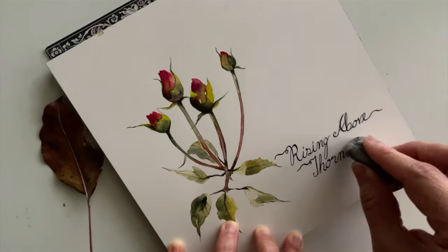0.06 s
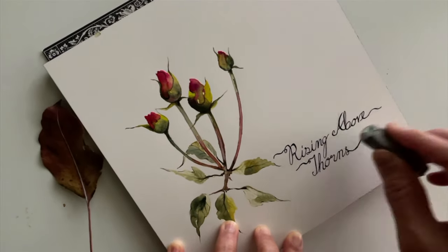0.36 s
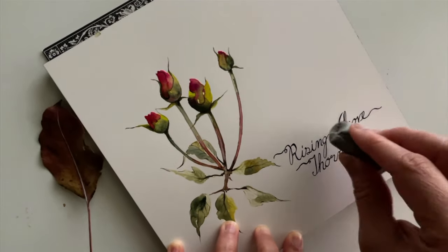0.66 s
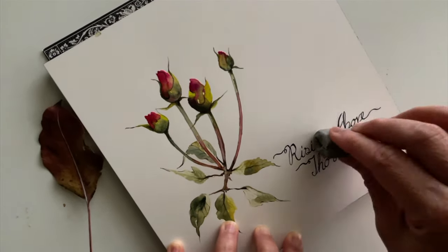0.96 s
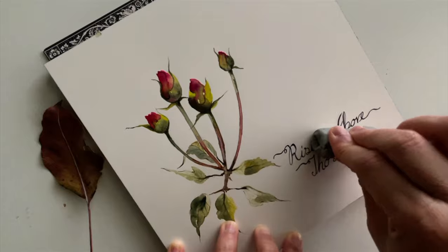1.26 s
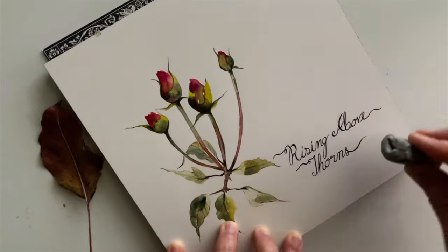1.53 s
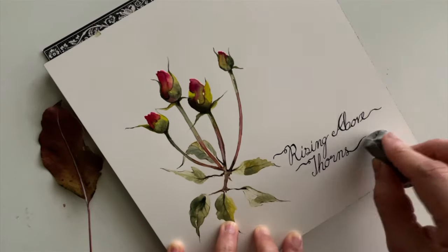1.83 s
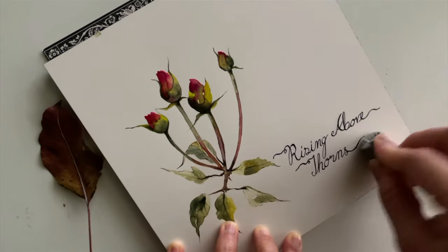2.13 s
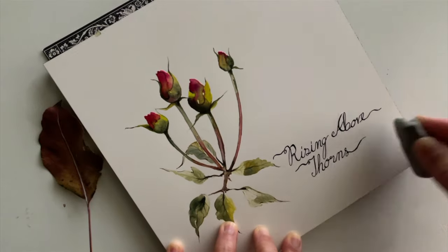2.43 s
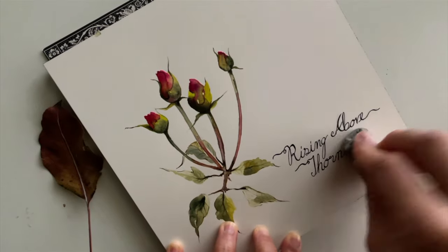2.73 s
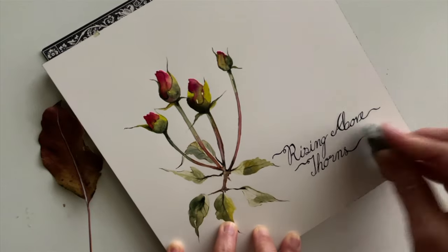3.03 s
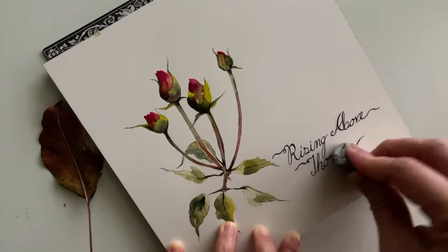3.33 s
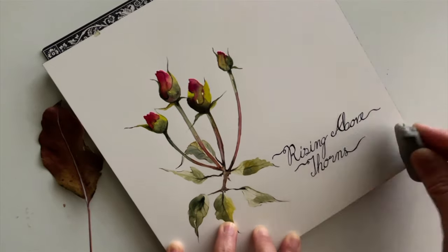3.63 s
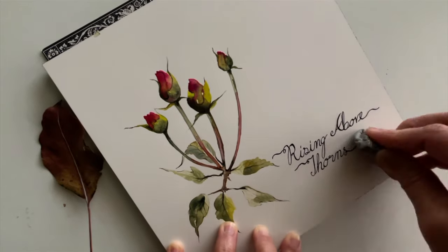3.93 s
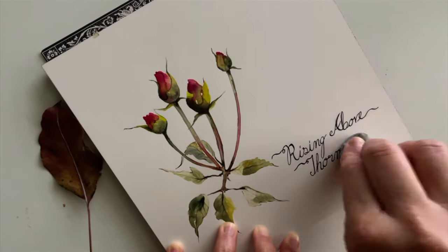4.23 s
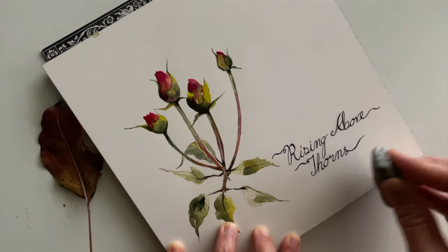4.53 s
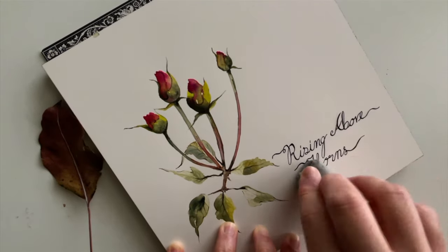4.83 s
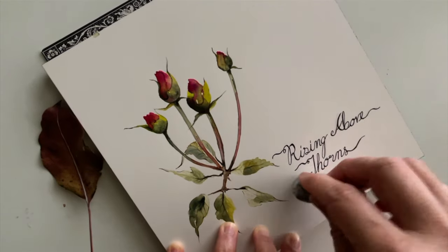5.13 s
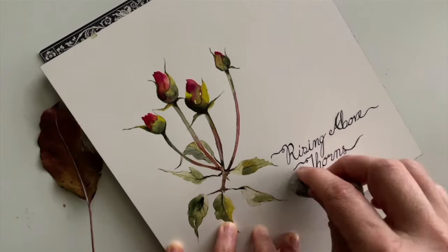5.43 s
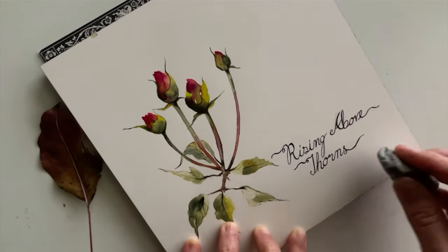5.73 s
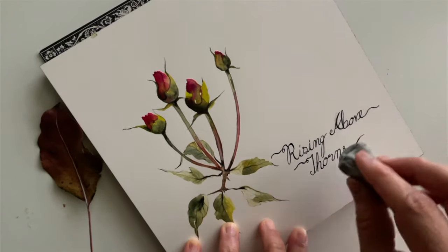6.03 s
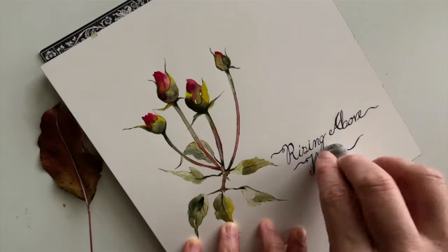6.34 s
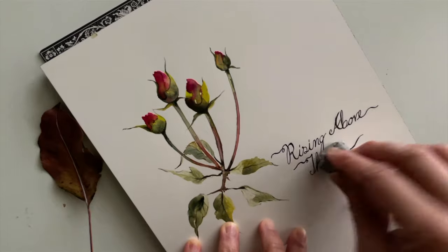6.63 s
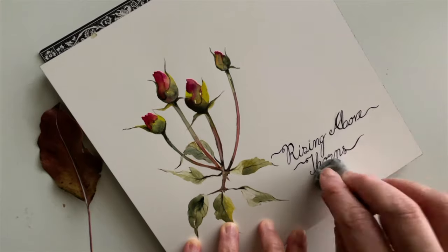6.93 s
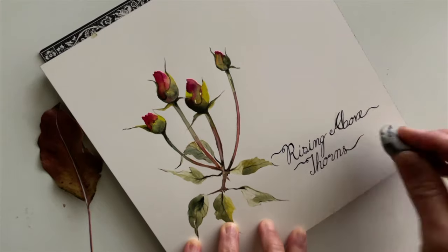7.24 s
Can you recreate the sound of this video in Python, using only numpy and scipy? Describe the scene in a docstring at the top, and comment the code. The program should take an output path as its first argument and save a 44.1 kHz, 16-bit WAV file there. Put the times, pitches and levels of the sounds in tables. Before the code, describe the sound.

Two quick runs of eraser taps on a paper pad, with faint rubbing and small ticks, in a quietly humming room.

```python
"""Dabbing with a kneaded eraser

A soft eraser is dabbed on a block of watercolour paper, in two quick runs and single light presses.
Each dab slaps the top sheet down and thumps the block; after quick dabs the sticky rubber ticks as it
peels off. In between, eraser and fingers brush over the paper. A low hum fills the quiet room."""
import sys
import numpy as np
from scipy import signal
from scipy.fft import rfft, irfft
from scipy.io import wavfile

SR = 44100
rng = np.random.default_rng(int(sys.argv[2]) if len(sys.argv) > 2 else 0)


def wav_out(sig):
    """Save sig, one row per channel (or a flat mono array), as 16-bit PCM at SR to the path in sys.argv[1]."""
    wavfile.write(sys.argv[1], SR, np.round(np.clip(np.atleast_2d(sig).T, -1, 1) * 32767).astype(np.int16))


N = 325458


def amp(db):
    """Turns decibels into a gain."""
    return 10 ** (np.asarray(db) / 20)

def unit(x):
    """Scales a signal to an average (rms) level of 1."""
    return x / np.sqrt(np.mean(x ** 2) + 1e-30)

def burst(x, db):
    """Gives a short sound the energy of 10 ms at this level."""
    return amp(db) * x / np.sqrt(np.sum(x ** 2) / (SR / 100))

def freqs(size=N):
    """The frequencies in the spectrum of this many samples."""
    return np.fft.rfftfreq(size, 1 / SR)

def read(points, hz):
    """Reads between the rows of a table, on a pitch-like (log) scale."""
    f, value = np.transpose(points)
    return np.interp(np.log(hz + 1), np.log(f + 1), value)

def add(mix, s, sound):
    """Mixes a sound in at s seconds."""
    part = mix[max(round(s * SR), 0):][:len(sound)]
    part += sound[:len(part)]

def colour(x, points):
    """Gives a long signal the tone colour in a table, at level 1."""
    return unit(irfft(rfft(x) * amp(read(points, freqs())), N))

def drift(max_hz):
    """A smooth random wander, no faster than max_hz."""
    return unit(irfft(rfft(rng.standard_normal(N)) * (freqs() < max_hz), N))


# Tone colour of the room's noise: f/Hz, level/dB
ROOM_NOISE = [(20, -15), (48, -2), (68, -4.5), (90, -4), (125, -8.5), (165, -11), (270, -13.5),
              (400, -20.5), (520, -21.5), (720, -35), (1500, -43.5), (2200, -45), (4000, -52), (12500, -60),
              (14000, -59.5)]
# How alike that noise is left and right: f/Hz, likeness/0-1
LIKENESS = [(60, 1), (150, 0.97), (300, 0.76), (600, 0), (1500, 0), (4000, 0), (12000, 0.2)]

def background(noise_db=-58, hum_hz=121.65, hum_db=-60.5):
    """Low rumble, faint hiss and a slightly wavering mains hum."""
    left, other = rfft(rng.standard_normal((2, N)))
    same = read(LIKENESS, freqs())
    right = same * left + np.sqrt(1 - same ** 2) * other
    air = np.array([colour(irfft(side, N), ROOM_NOISE) for side in (left, right)])
    hum = np.sin(2 * np.pi * hum_hz * np.arange(N) / SR + .52 * drift(3))
    hum *= amp(-.5 * drift(5))
    return amp(noise_db) * air + amp(hum_db) * unit(hum)

# How long the room takes to fade by 60 dB: f/Hz, t/s
ROOM_FADE = [(150, .33), (600, .24), (2000, .22), (3500, .21), (6000, .15), (14000, .09)]

def room_tail(level_db=-24, mono_hz=250, dull_hz=2000, rise_s=.00047):
    """The room's short, dull answer to a click, alike on both sides in the bass."""
    hz, t, noise = signal.stft(rng.standard_normal((2, SR // 2)), SR, nperseg=256)
    hz = hz[:, None]
    same = 1 / (1 + (hz / mono_hz) ** 4)
    noise[1] = same * noise[0] + np.sqrt(1 - same ** 2) * noise[1]
    noise *= amp(-60 * t / read(ROOM_FADE, hz)) * (1 - np.exp(-t / rise_s))
    noise /= np.sqrt(1 + (hz / dull_hz) ** 2)
    tail = signal.istft(noise, SR, nperseg=256)[1]
    return amp(level_db) * tail / np.linalg.norm(tail[0])

def room_echoes(x, echo_s=.019, echo_db=-22, tails=4, shifts_per_s=9):
    """One dull echo, and a short room tail that keeps varying, so no two hits ring alike."""
    turn = np.arange(N) / SR * shifts_per_s
    wash = np.zeros((2, N))
    for k in range(tails):
        distance = abs((turn - k) % tails - tails / 2)
        share = np.cos(np.pi / 2 * np.minimum(distance, 1))  # each tail fades into the next
        wash += signal.fftconvolve((share * x)[None], room_tail(), axes=1)[:, :N]
    echo = np.zeros(N)
    add(echo, echo_s, amp(echo_db) * signal.lfilter(*signal.butter(2, 1500, fs=SR), x))
    return wash + echo

# How far the left side runs ahead of the right: f/Hz, phase/radians
SIDE_PHASE = [(0, 0), (1900, .05), (3200, .55), (4800, 1.3), (8200, 2.5), (10400, 3.14), (13400, 4.9),
              (16500, 6.1)]

def left_and_right(x):
    """Sound from the paper reaches the two sides out of step in the treble."""
    phase = np.interp(freqs(), *np.transpose(SIDE_PHASE))
    return irfft(rfft(x) * np.exp(.5j * np.array([phase, -phase])), N)


def friction(spectrum, slips_per_s=11000, spread_db=3.5):
    """Many tiny slips over the rough paper, blended with smooth noise."""
    slips = rng.standard_normal(N) * amp(spread_db * np.minimum(rng.exponential(1, N), 4))
    slips *= rng.random(N) < slips_per_s / SR
    return colour(unit(slips) + .84 * rng.standard_normal(N), spectrum)

# Dull rub of the sheet: f/Hz, level/dB
RUB = [(300, -14.5), (600, 2.5), (1000, 4), (1550, -1.5), (2200, 3.5), (2900, -5.5), (3700, -4), (6000, -8),
       (9000, -11), (16000, -39)]
# Bright hiss of its grain: f/Hz, level/dB
HISS = [(1500, -35.5), (4000, -15.5), (7000, -7.5), (9000, -2), (11700, 1), (12700, -0.5), (13600, -12),
        (15700, -14.5), (16300, -40)]
# Quick brushing strokes: t/s, length/s, hiss level/dB, pressure/0-1
STROKES = [(1.034, .05, -83.5, 1), (1.09, .025, -76.5, 0.1), (1.369, 0.046, -68, .35),
           (1.948, 0.13, -86.5, 1), (2.261, 0.032, -73, .05), (2.421, 0.038, -69.5, 0.63),
           (2.783, 0.049, -77, .8), (2.893, 0.033, -77, 0.88), (3.057, 0.025, -68, .2),
           (3.187, 0.01, -71.5, 0.97), (3.264, 0.067, -81, 0.97), (3.349, 0.044, -74.5, .05),
           (3.453, 0.02, -70, 0.46), (3.565, 0.09, -69, 0.43), (3.942, 0.051, -80.5, .4),
           (4.152, 0.065, -74.5, 0.14), (4.366, 0.1, -71, 0.53), (4.983, 0.028, -67.5, 0.54),
           (5.685, 0.1, -76.5, 0.57), (5.845, 0.063, -79, .6), (6.308, 0.055, -84.5, 1),
           (6.477, 0.042, -72.5, 0.05), (6.568, .03, -75.5, .05), (6.704, 0.059, -65, 0.36),
           (7.221, .027, -65, 0.56)]

def brushing(drag_wait_s=.04, drag_db=-86, drag_pressure=.92, rest_db=-101):
    """Strokes, and firm drags just after most dabs, swell and fade with the speed of the hand."""
    t = np.arange(N) / SR
    drags = [(s + drag_wait_s, length, drag_db, drag_pressure) for s, *_, length in DABS if length > 0]
    rub_power = np.zeros(N)
    hiss_power = amp(rest_db + 4 * drift(4.3)) ** 2  # resting fingers stir faintly
    for start, length, db, pressure in STROKES + drags:
        along = 2 * (t - start) / length - 1
        power = amp(db) ** 2 * np.exp(-.3 * along ** 2 - .4 * along ** 4)
        rub_power += power * amp(-21 + 21.5 * pressure) ** 2  # pressure brings out the rub
        hiss_power += power
    rub = np.sqrt(rub_power) * friction(RUB) * amp(3 * drift(45))
    hiss = np.sqrt(hiss_power) * friction(HISS) * amp(4 * drift(80))
    return rub + hiss

def judder(start_s=1.238, length_s=.05, slips_per_s=255, level_db=-48):
    """The rubber grips and lets go in one short, uneven run, scuffing the grain."""
    size = round(length_s * SR)
    along = np.arange(size) / size
    turns = np.cumsum(slips_per_s * (1 + .11 * drift(170)[:size])) / SR
    rough_tone = [(150, -8), (330, 0), (550, -13), (950, -18), (1500, -35), (6000, -60)]  # f/Hz, level/dB
    rough = colour(rng.standard_normal(N), rough_tone)[:size]
    slips = np.sin(2 * np.pi * turns) + amp(-12) * rough
    swell = np.sin(np.pi * along) * np.exp(-3 * along)
    out = np.zeros(N)
    add(out, start_s, amp(level_db) * unit(slips * swell))
    return out

# Tone colour of rubber squashed on paper: f/Hz, level/dB
SCUFF = [(200, -9.5), (450, 1), (1300, -3.5), (2200, -8), (3500, -12.5), (7000, -17), (12000, -24),
         (16000, -40.5)]

def scuff(fade_s=.15, rise_s=.002, size=8192):
    """The squashed rubber creeps over the grain for a moment."""
    t = np.arange(size) / SR
    noise = irfft(rfft(rng.standard_normal(size)) * amp(read(SCUFF, freqs(size))))
    return noise * amp(-60 * t / fade_s) * (1 - np.exp(-t / rise_s))

# Ringing tones of the paper block: f/Hz, level/dB, time to fade by 60 dB/s
BLOCK_TONES = [(56, -11, 0.26), (104, -14.5, 0.28), (124.5, 6.5, 0.045), (146, -2, 0.14),
               (195, -10.5, 0.14), (273.3, -5, .13), (325, -10.5, 0.11), (484, -17, .13),
               (527, -23.5, 0.16)]

def thump(lift_db, rise_s=.0028, scatter_db=3):
    """The block rings on the table, never twice the same; lift_db raises its upper tones."""
    t = np.arange(SR // 3) / SR
    ring = np.zeros(len(t))
    for hz, db, fade_s in BLOCK_TONES:
        louder, higher = rng.standard_normal(2)
        level = db + lift_db * np.clip(np.log2(hz / 150), 0, 1) + scatter_db * louder
        ring += amp(level - 60 * t / fade_s) * np.sin(2 * np.pi * hz * (1 + higher / 50) * t)
    return ring * (1 - np.exp(-t / rise_s))

# Fingers knead the eraser without lifting it: t/s, scuff level/dB
PRESSES = [(.649, -64), (1.237, -66), (1.294, -69), (1.453, -71), (1.879, -70), (2.061, -72),
           (2.676, -70.5), (4.122, -73), (6.442, -73.5), (7.089, -75)]

def presses(dull_hz=900, thump_db=-53):
    """Kneading makes a short muffled scuff and softly bumps the block."""
    out = np.zeros(N)
    muffle = signal.butter(4, dull_hz, fs=SR)
    for s, db in PRESSES:
        add(out, s, burst(signal.lfilter(*muffle, scuff(fade_s=.037)), db))
        add(out, s, burst(thump(lift_db=8), thump_db))
    return out

def click_spectrum(gain):
    """Spectrum of the quickest click with this tone colour (minimum phase)."""
    log_gain = np.log(np.maximum(gain / gain.max(), 1e-4))
    mirrored = np.concatenate([log_gain, log_gain[-2:0:-1]])
    return np.exp(np.conj(signal.hilbert(mirrored)))[:len(gain)]

# Tone colour of snapping paper fibres: f/Hz, level/dB
FIBRES = [(1500, -27.5), (3500, -5), (5000, -4.5), (7000, -3), (9500, 6), (12500, -6), (14000, -17.5),
          (16500, -24.5)]

def crackle(spectrum=FIBRES, decay_s=.0011, size=2048):
    """A tight cluster of paper fibres snaps, then trails off faintly."""
    t = np.arange(size) / SR
    noise = rng.standard_normal(size) * (np.exp(-t / decay_s) + amp(-26) * np.exp(-t / .003))
    return irfft(rfft(noise) * click_spectrum(amp(read(spectrum, freqs(size)))))

# Tone colour of a sharp snap: f/Hz, level/dB
SNAP_COLOUR = [(700, -15), (1400, -16), (2000, -23), (2900, -11), (3800, -18), (5000, -13), (6500, -9),
               (9500, 0), (11000, -1), (12700, -1), (14000, -6), (16500, -13)]
# Sharp snaps: t/s, level/dB
SNAPS = [(2.2295, -36.5), (5.5487, -41)]

def snaps():
    """Bright, brittle clicks, like a fingernail catching the paper."""
    out = np.zeros(N)
    for s, db in SNAPS:
        add(out, s, burst(crackle(SNAP_COLOUR, decay_s=.0004), db))
    return out

# Broad tones of the top sheet: f/Hz, width/Hz, level at place 0/dB, level at place 1/dB
SHEET_TONES = [(560, 260, -3.5, -10), (760, 450, -3, 6), (1090, 230, 0, -1.5), (1393, 530, 3, -7.5),
               (1800, 400, -13.5, -6), (2220, 580, -16.5, 0), (2899, 510, -6, -9), (4000, 380, -29.5, -15),
               (5000, 220, -15.5, -34)]

def slap(hardness, place, bass_delay_s=.0035, size=4096):
    """The sheet is pushed flat: its tones depend on the spot, and a harder hit is brighter."""
    f = freqs(size)
    power = amp(-24) ** 2 / (1 + (f / 2500) ** 6)  # fills the gaps between the tones
    for hz, width, db_0, db_1 in SHEET_TONES:
        centre = hz * (1 + .02 * rng.standard_normal())
        level = db_0 + place * (db_1 - db_0)
        power += amp(level) ** 2 / (1 + (2 * (f - centre) / width) ** 2) ** 3
    brightness = amp(hardness * np.log2(np.maximum(f, 600) / 1000))
    bass_cut = f ** 2 / (f ** 2 + 330 ** 2)
    click = click_spectrum(np.sqrt(power) * brightness * bass_cut)
    delay = bass_delay_s / (1 + (f / 600) ** 1.5)  # low ripples in the sheet arrive last
    return irfft(click * np.exp(-2j * np.pi * np.cumsum(delay) * SR / size))

# The sticky rubber peels off after a quick dab: t/s, level/dB
PEELS = [(0.0528, -68), (0.1643, -55), (.2773, -54.5), (0.3958, -65.5), (5.2095, -61), (5.4227, -54.5),
         (5.5485, -40.5)]

def peels(usual_db=-55):
    """The rubber lets go with a tick and the sheet springs back; a stronger pull is brighter."""
    out = np.zeros(N)
    for s, db in PEELS:
        pull = db - usual_db
        add(out, s, burst(slap(hardness=-.37 + .14 * pull, place=.68), db))
        add(out, s, burst(crackle(), db - 1 + .3 * pull))
        add(out, s, burst(thump(lift_db=4.5), db - 4))
    return out

# The eraser lands: t/s, slap level/dB, hardness/dB per octave, place on the sheet/0-1, drag length/s
DABS = [(0.0113, -37, -3.5, 0.44, 0.034), (0.1191, -35, -4, 0.1, 0.023), (.2285, -34.5, -3.5, 0.03, 0.15),
        (0.3334, -34.5, -3, .2, 0), (.655, -67, 0.5, 0.85, 0), (.9, -60, -2, 0.66, 0.019),
        (0.9175, -50.5, -9, 0.76, 0.23), (2.2306, -58, -0.5, 0.46, 0), (2.5784, -51, -7, 0.99, 0.075),
        (3.7949, -53, -6, 0.9, 0.23), (4.7789, -52.5, -2, 0.73, 0.079), (5.158, -40, 2, 0.76, 0.013),
        (5.2633, -36, 3, 0.3, 0.16), (5.3715, -35.5, 2, .5, 0.054), (5.4784, -32.5, 4.5, .46, 0),
        (6.231, -69.5, -4, .7, 0.15), (6.9721, -51, -3.5, 0.82, 0.23), (7.3565, -63, -6, .7, 0.061)]

def dabs(touch_lead_s=.0048, thump_lag_s=.004, hand_scuff_db=-71, hand_thump_db=-52):
    """The rubber's edge touches first, the sheet slaps and crackles, then the block takes the blow."""
    out = np.zeros(N)
    for s, db, hardness, place, _ in DABS:
        # Harder landings scuff and thump more; the weight of the hand always adds a little.
        squash = np.hypot(amp(db - 21 + .65 * hardness), amp(hand_scuff_db))
        push = np.hypot(amp(db + 2 + .4 * hardness), amp(hand_thump_db))
        add(out, s - touch_lead_s, burst(slap(hardness + 6, place), db - 27))
        add(out, s, burst(slap(hardness, place), db))
        add(out, s, burst(crackle(), db - 8 + .54 * hardness))
        add(out, s, squash * burst(scuff(), 0))
        # Minus sign: the block is pushed away first.
        add(out, s + thump_lag_s, -push * burst(thump(lift_db=1.3 * hardness), 0))
    return out


def scene():
    """The work on the paper, close by, in the humming room."""
    paper = dabs() + peels() + presses() + brushing() + judder() + snaps()
    return left_and_right(paper) + room_echoes(paper) + background()

def record(dry):
    """Cuts off the very highest treble, above 16600 Hz."""
    treble_cut = signal.firwin(511, 16600, window=("kaiser", 9), fs=SR)
    return signal.oaconvolve(dry, treble_cut[None], "same")


dry = scene()
out = record(dry)
wav_out(out)
```